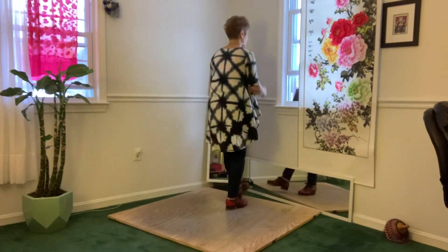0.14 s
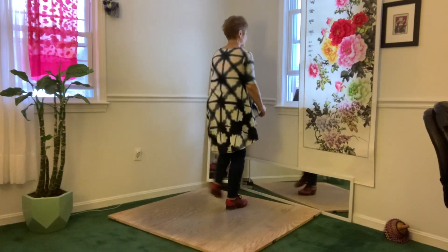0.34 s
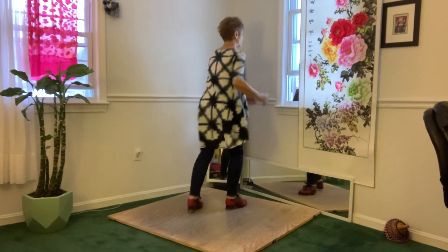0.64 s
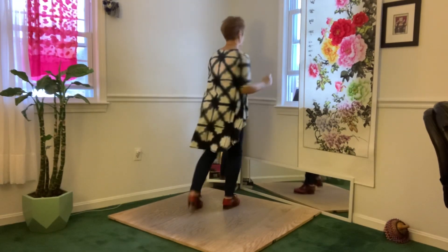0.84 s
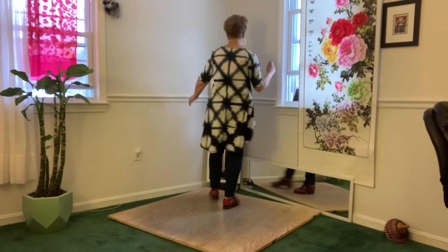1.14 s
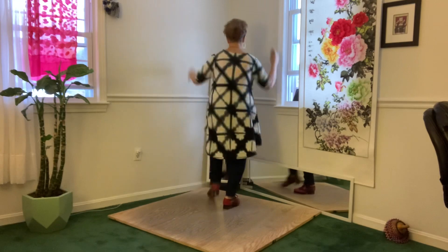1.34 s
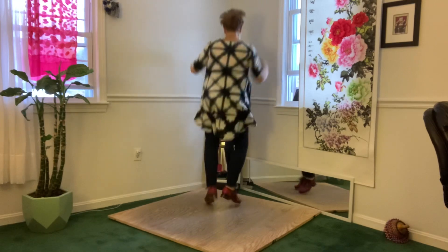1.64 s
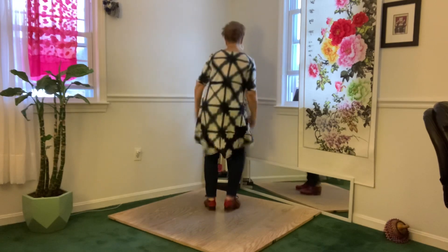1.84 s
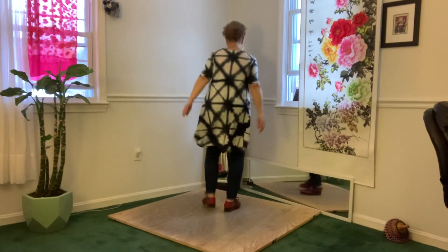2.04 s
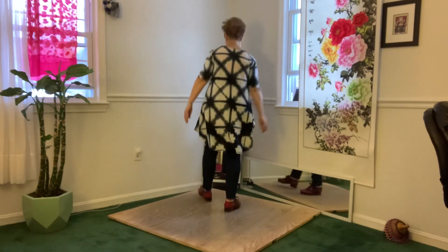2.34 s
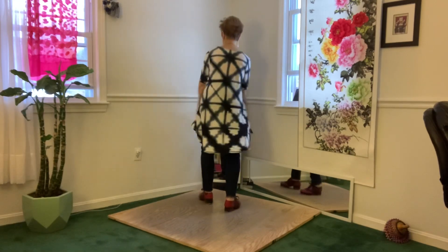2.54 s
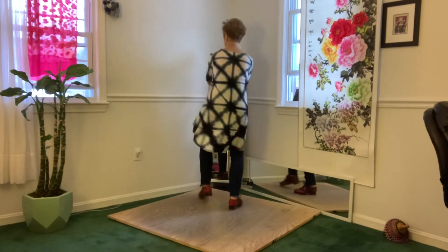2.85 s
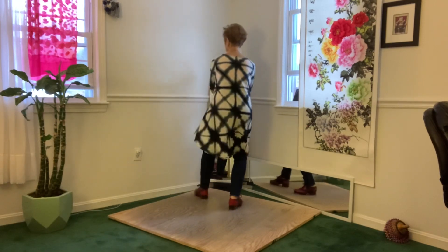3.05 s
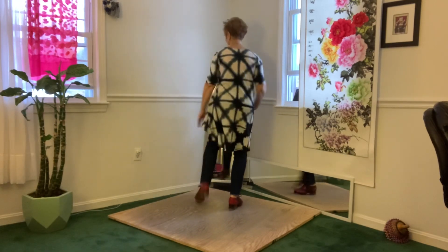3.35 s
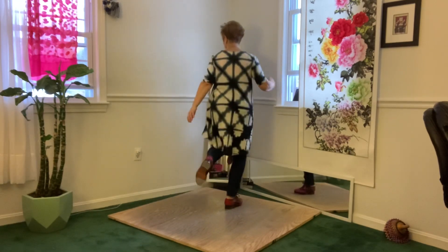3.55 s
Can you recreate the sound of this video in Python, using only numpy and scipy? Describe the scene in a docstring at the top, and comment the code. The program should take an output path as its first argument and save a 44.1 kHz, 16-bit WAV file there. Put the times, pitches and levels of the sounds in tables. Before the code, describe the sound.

Tap shoes click on a wooden board in a small room, each metal tap with a hollow knock and brief echo. Taps land at about 0.2, 0.5, 0.7, 1.0 and 1.2 seconds, then a quick, lighter cluster from 1.5 to 1.8. Two more follow at 2.1 and 2.3, heavier thudding double taps at 2.7 and 2.85, a crisp tap at 3.2 and a duller step at 3.4, over faint hush.

```python
"""A small room, where tap shoes dance on a plywood board over carpet. Each metal plate clicks, chatters
for a few milliseconds and knocks the board, whose modes ring briefly. Where the dancer's weight follows,
the board thuds and the floor booms. Near walls and a short reverberation answer, over a faint hush."""
import sys
import numpy as np
from scipy import signal
from scipy.fft import rfft, irfft, next_fast_len
from scipy.io import wavfile

SR = 44100
rng = np.random.default_rng(int(sys.argv[2]) if len(sys.argv) > 2 else 0)


def unload_wav(signal):
    """Save mono or channel-first audio to the path in sys.argv[1] as 16-bit WAV at rate SR, clipped to [-1, 1]."""
    wavfile.write(
        sys.argv[1],
        SR,
        np.round(np.clip(np.atleast_2d(signal).T, -1, 1) * 32767).astype(np.int16),
    )


N = 163170
LENGTH = 32768  # samples in one impact
TIME_S, FREQ_HZ = np.arange(LENGTH) / SR, np.fft.rfftfreq(LENGTH, 1 / SR)
MODE_SCATTER_DB = 1.5


def taps():
    """Impact excitation: each plate chatters and knocks the board; the treble is mostly a gritty burst."""
    # start_s, plate_db, plate_hz, knock_db, crack_db, edge_db, edge_hz, sizzle_db, sizzle_hz, chatter_s
    strikes = [(-.02,-41.5,2424,-34.5,-28.5,-33.5,4235,-51.5,8000,0.0072),
               (0.1554,-21,2493,-22.5,-23,-20,3900,-37,8000,0.014),
               (.49,-25.5,2810,-24,-18,-34,4140,-28,6680,.011),
               (0.6718,-25.5,2970,-21,-22.5,-22,4230,-28.5,8000,0.011),
               (.691,-28.5,3200,-24.5,-40.5,-24.5,4474,-25.5,8640,.01),
               (1.04,-26,3326,-23,-24.5,-24.5,4070,-34,8000,0.013),
               (1.2205,-23.5,3130,-18.5,-18.5,-21.5,4430,-29,8500,0.0091),
               (1.525,-27.5,2610,-27,-29,-38,4750,-43,11410,0.013),
               (1.584,-28,2220,-27,-33.5,-33,3600,-37,7770,0.0099),
               (1.686,-32.5,2340,-30,-41.5,-47,3800,-40,8050,.011),
               (1.783,-27.5,2960,-19.5,-46,-37,5140,-38,7150,0.011),
               (2.1285,-25,2760,-22.5,-21,-25.5,5020,-37.5,7990,0.013),
               (2.3215,-23.5,2484,-14.5,-18,-23.5,3450,-34.5,9300,0.01),
               (2.661,-23,2830,-21,-27.5,-28,4490,-28,8180,0.014),
               (2.679,-25,3350,-40,-36.5,-31,4860,-32,7990,0.012),
               (2.842,-27,2350,-18.5,-19.5,-22.5,4270,-27,8470,0.01),
               (2.866,-26.5,2740,-19.5,-28,-18.5,4540,-25,10050,0.0093),
               (3.1328,-55,2600,-58,-60,-54,4000,-62,9200,0.022),
               (3.1882,-25.5,3240,-24,-22,-22,4260,-38.5,8480,0.009),
               (3.368,-41,3630,-23.5,-41.5,-45.5,5000,-41,7970,.012)]
    out = np.zeros(N + LENGTH)
    for (start_s, plate_db, plate_hz, knock_db, crack_db,
         edge_db, edge_hz, sizzle_db, sizzle_hz, chatter_s) in strikes:
        blows = chatter(chatter_s)
        knock = amp(knock_db) * board_knock()
        mids = click_band(plate_db, plate_hz, q=1.42) - click_band(crack_db, hz=1209, q=0.98)
        treble = click_band(sizzle_db, sizzle_hz, q=0.95) - click_band(edge_db, edge_hz, q=1.66)
        grit = noise_burst(TIME_S * np.exp(-3.2 * TIME_S / abs(chatter_s)))
        direct = knock + blows * mids + (amp(-9.5) * blows + amp(-0.5) * grit) * treble
        reflected = reflections(amp(-3) * knock + treble) + reflections(mids)
        add(out, start_s, irfft(direct + reflected, LENGTH))
    return out[:N]


def chatter(span_s, contacts=9, scatter_db=2.5, fade_db=11):
    """Repeated contact: the spectrum of a plate's uneven, fading train of impulses."""
    order = np.arange(contacts)
    when_s = (order + rng.random(contacts)) / contacts * abs(span_s) * (order > 0)
    level_db = scatter_db * rng.standard_normal(contacts) - fade_db * order / contacts
    level_db[0] -= 2
    force = amp(level_db) * rng.choice([-1, 1], contacts)
    return rfft(np.bincount((when_s * SR).astype(int), force / np.linalg.norm(force)), LENGTH)


def click_band(level_db, hz, q):
    """Damped resonance: a broad peak dies at once, a narrower one at the same pitch rings longer."""
    broad, narrow = resonance(hz, hz / q), resonance(hz, hz / q / 3.5)
    return amp(level_db) * fixed_energy(broad ** 2 + amp(-6) * narrow ** 2)


def board_knock(lag_s=0.002):
    """Modal response: the spectrum of the board's midrange modes, sounding just after the plate."""
    # pitch_hz, width_hz, level_db
    modes = [(572, 97, 1.5), (640.7, 60, 1.5), (712, 90, -2.5)]
    delay = np.exp(-2j * np.pi * FREQ_HZ * lag_s)
    return delay * fixed_energy(modal_sum(modes) * resonance(modes[1][0], width_hz=523))


def landings(rise_s=0.035, hold_s=0.054, boom_t60_s=0.3):
    """Forced vibration: the weight drives the board's low modes; the floor answers with one deep tone."""
    # start_s, thud_db, deep_db, press_s, boom_db, boom_hz
    footfalls = [(-.02,-34,-36,0.027,-41,56), (.158,-28.5,-30,0.019,-48,54), (.493,-26,-27,.03,-30.5,59),
                 (0.677,-23.5,-26,0.065,-22,57.9), (1.043,-26,-31.5,0.037,-57,65),
                 (1.224,-26.5,-28,0.011,-41.5,55), (1.367,-53,-48.5,0.069,-37,84.5),
                 (1.532,-28.5,-26,0.044,-33.5,100), (1.687,-26.5,-46.5,0.034,-40,100),
                 (1.722,-38,-34.5,0.035,-30.5,57), (1.783,-26,-34,0.049,-19,52.7),
                 (2.132,-28,-31,0.016,-35,55), (2.324,-26,-30,0.021,-40,52.2),
                 (2.663,-20.5,-26.5,0.045,-20,54.4), (2.845,-26,-35,0.023,-47.5,55),
                 (2.856,-19.5,-20,0.054,-28,70.5), (3.19,-25.5,-32.5,0.045,-38.5,52.5),
                 (3.371,-25,-31.5,0.04,-20,53.8)]
    # The board's low modes, in two groups: pitch_hz, level_db, t60_s
    thud_modes = [(240.7, -2.5, 0.12), (265, 0, .3), (298.4, 3, 0.34), (351.1, 2, .35), (383, -6.5, 0.75),
                  (417.5, -3, .3)]
    deep_modes = [(100, 1, 0.1), (114.5, -3, .3), (163.3, 1.5, 0.29), (189.1, -2, 0.44), (218.5, 0, 0.42)]
    out = np.zeros(N + LENGTH)
    swell = (1 - np.exp(-(TIME_S / rise_s) ** 2)) * amp(-60 * np.maximum(TIME_S - hold_s, 0) / boom_t60_s)
    for start_s, thud_db, deep_db, press_s, boom_db, boom_hz in footfalls:
        thud = amp(thud_db) * board_rumble(thud_modes, press_s)
        deep = amp(deep_db) * board_rumble(deep_modes, press_s)
        boom = amp(boom_db) * swell * np.sin(2 * np.pi * boom_hz * TIME_S)
        add(out, start_s, thud + deep + boom)
    return out[:N]


def board_rumble(modes, press_s, build_s=0.004):
    """Free decay: modes held up while the weight presses then ring out, blurred by the room."""
    released_s = np.maximum(TIME_S - abs(press_s), 0)
    ring = np.zeros(LENGTH)
    for hz, db, t60_s in modes:
        envelope = amp(db + MODE_SCATTER_DB * rng.standard_normal() - 60 * released_s / t60_s)
        ring += envelope * np.sin(2 * np.pi * (hz * TIME_S + rng.random()))
    ring *= 1 - np.exp(-TIME_S / build_s)
    response = modal_sum([(hz, hz / 8, db) for hz, db, _ in modes])
    blur = irfft(response * reverberation(build_s, press_s), LENGTH)
    return unit_onset(unit_onset(ring) + amp(-1) * unit_onset(blur))


def modal_sum(modes):
    """Superposition: modes of alternating sign add, each struck a little differently every time."""
    return sum((-1) ** k * amp(db + MODE_SCATTER_DB * rng.standard_normal()) * resonance(hz, width_hz)
               for k, (hz, width_hz, db) in enumerate(modes))


def resonance(centre_hz, width_hz):
    """The frequency response of a damped oscillator."""
    return 1j * FREQ_HZ * width_hz / (centre_hz ** 2 - FREQ_HZ ** 2 + 1j * FREQ_HZ * width_hz)


def reflections(spectrum, walls_t60_s=0.076, cutoff_hz=7000):
    """Reflection: near walls and the diffuse field return a tap's spectrum through a gentle low-pass."""
    diffuse = amp(-1) * reverberation(build_s=0.012, hold_s=0)
    walls = amp(-3) * noise_burst(TIME_S * amp(-60 * TIME_S / walls_t60_s))
    return spectrum * (diffuse + walls) / (1 + 1j * FREQ_HZ / cutoff_hz)


def reverberation(build_s, hold_s):
    """Diffuse field: the spectrum of a unit-energy tail that builds, holds, then decays band by band."""
    # frequency_hz, t60_s
    decay_times = [(60, 0.19), (200, 0.24), (500, 0.42), (1500, 0.37), (4000, 0.32), (8000, 0.3),
                   (15000, 0.15)]
    # frequency_hz, level_db
    colour = [(100, -7), (400, 1), (1500, 1), (4000, 3.6), (8000, 2), (15000, 8)]
    hz, t, noise = signal.stft(rng.standard_normal(LENGTH * 3 // 4), SR, nperseg=256)
    decay_db = 60 * np.maximum(t - abs(hold_s), 0) / along(decay_times, hz)[:, None]
    envelope = amp(along(colour, hz)[:, None] - decay_db) * (1 - t / t[-1])
    tail = signal.istft(noise * envelope, SR, nperseg=256)[1]
    tail *= 1 - np.exp(-np.arange(len(tail)) / SR / build_s)
    return rfft(tail / np.linalg.norm(tail), LENGTH)


def room_hush(level_db=-52):
    """Ambient noise: a steady random hush, strongest in the bass."""
    # frequency_hz, relative_density_db
    spectrum = [(18, -15.5), (30, 20.5), (55, 25), (93, 9), (184, 6.5), (340, 8.5), (526, -2.5),
                (1200, -8.5), (4650, -16.5), (7500, -20.5), (16000, -22)]
    gain = amp(along(spectrum, np.fft.rfftfreq(N, 1 / SR)))
    hush = irfft(rfft(rng.standard_normal(N)) * gain, N)
    return amp(level_db) * hush / hush.std()


def noise_burst(envelope):
    """The spectrum of enveloped white noise with unit energy."""
    noise = rng.standard_normal(LENGTH) * envelope
    return rfft(noise / np.linalg.norm(noise))


def amp(db):
    """Decibels as an amplitude ratio."""
    return 10 ** (np.asarray(db) / 20)


def along(points, hz):
    """Interpolate (frequency_hz, value) points on a logarithmic frequency axis."""
    point_hz, values = np.transpose(points)
    return np.interp(np.log(hz + 1), np.log(point_hz + 1), values)


def fixed_energy(response):
    """Scale a frequency response to the energy of 10 ms at rms 1."""
    return response * np.sqrt(SR / 100 / np.sum(irfft(response, LENGTH) ** 2))


def unit_onset(sound):
    """Scale a sound to rms 1 over its first 50 ms."""
    return sound / np.sqrt(np.mean(sound[:SR // 20] ** 2))


def add(track, start_s, sound):
    """Mix in one impact, which may begin just before time zero."""
    start = round(start_s * SR)
    track[max(start, 0):][:LENGTH + min(start, 0)] += sound[max(-start, 0):]


def scene():
    """Superposition: taps, landings and hush add in one channel."""
    return (taps() + landings() + room_hush())[None]


def record(dry, low_hz=42, top_hz=15800):
    """Band limiting: the microphone drops the deepest bass and keeps nothing above its upper limit."""
    size = next_fast_len(N + SR)
    hz = np.fft.rfftfreq(size, 1 / SR)
    s = 1j * hz / low_hz
    highpass = s ** 2 / (1 + 1.2 * s + s ** 2)
    return irfft(rfft(dry, size) * highpass ** 2 * (hz < top_hz), size)[:, :N]


dry = scene()
out = record(dry)
unload_wav(out)
```